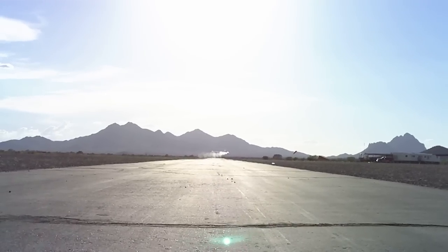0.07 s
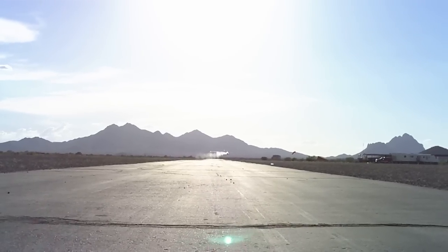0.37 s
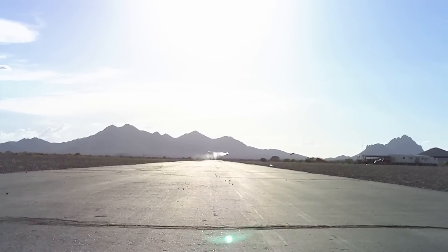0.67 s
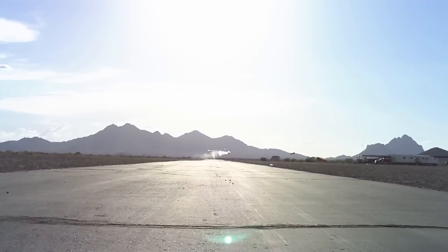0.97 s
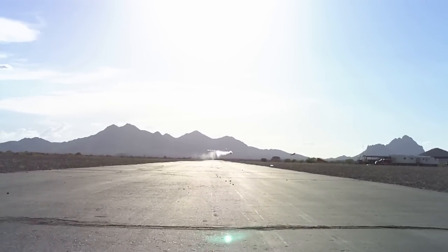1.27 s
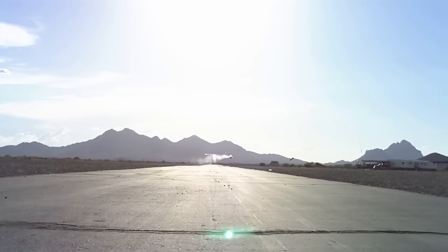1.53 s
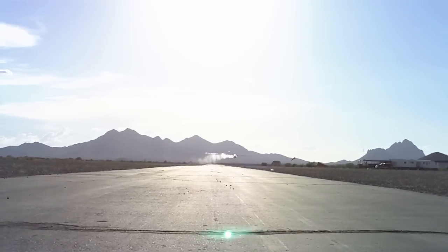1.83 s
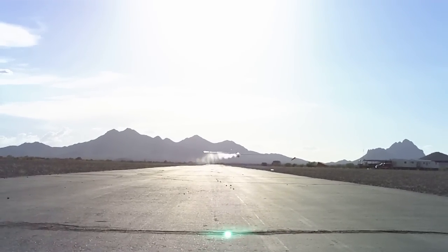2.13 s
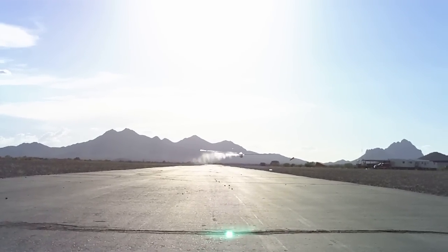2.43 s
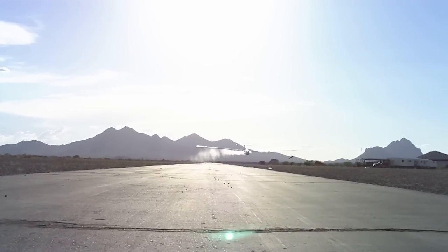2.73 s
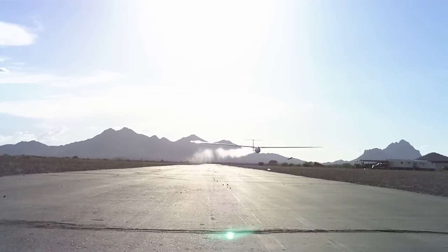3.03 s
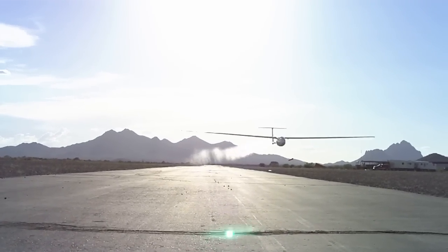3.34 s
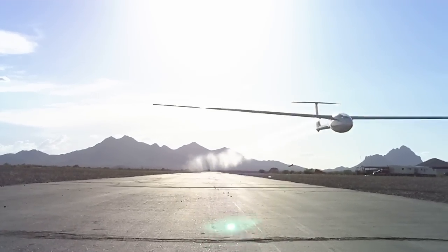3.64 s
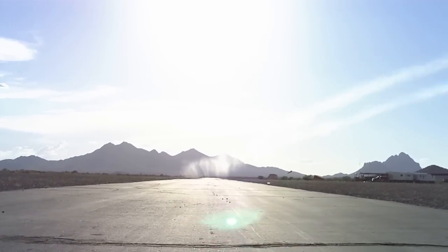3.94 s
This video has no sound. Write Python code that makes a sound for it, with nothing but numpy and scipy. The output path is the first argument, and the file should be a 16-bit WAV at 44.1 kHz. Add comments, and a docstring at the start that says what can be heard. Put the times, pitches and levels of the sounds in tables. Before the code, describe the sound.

The rush of air over a glider's wings builds from barely audible to loud and close, sweeping downward in tone at the end. Uneven gusts thump and rumble on the microphone at an open airfield.

```python
"""A glider comes in low over a runway and sweeps overhead: the rush of air over its wings swells and
brightens, and its reflection from the pavement cuts notches that sweep down as it nears.
Displaced air adds a low whoosh, and the airframe gives a few brief whistles.
Gusts rumble and pop on the microphone, over faint open-air hiss, far birds and a thin electrical whine."""
import sys
import numpy as np
from scipy import signal
from scipy.fft import rfft, irfft
from scipy.io import wavfile
from scipy.ndimage import uniform_filter1d

SR = 44100
rng = np.random.default_rng(int(sys.argv[2]) if len(sys.argv) > 2 else 0)


def store_wav(level_fs):
    """Save 16-bit WAV to argv[1]."""
    pcm = np.round(np.clip(np.atleast_2d(level_fs), -1, 1) * 32767)
    wavfile.write(sys.argv[1], SR, pcm.T.astype(np.int16))


N = 176400
T = np.arange(N) / SR
FREQS = np.fft.rfftfreq(N, 1 / SR)


# swell and brightness of the rush (time [s], level [dB], treble tilt [dB per 10 kHz])
RUSH_SWELL = [(0, -58, -16), (.3, -63, -26), (.55, -63, -9), (.85, -67.5, -16), (1.05, -58, -15.5),
              (1.28, -56, -16.5), (1.55, -58.5, -16.5), (2.0, -61.5, -11), (2.3, -62, -2.5),
              (2.6, -57.5, -9.5), (2.85, -51, -9.5), (3.15, -44, -9.5), (3.35, -42.5, 0.5),
              (3.5, -38.5, 2.5), (3.64, -31.5, -3.5), (3.73, -31.5, 1.5), (3.85, -30.5, 4.5),
              (3.94, -26, 4), (4.0, -20.5, 4)]
# colour of the airflow close by (frequency [Hz], relative level [dB])
RUSH_COLOUR = [(60, -6), (250, -6), (650, 1), (880, -5), (1200, -3), (2300, -2.5), (3300, -3), (4300, -4.5),
               (5200, -6.5), (6000, -7.5), (7000, -13), (10000, -18), (12500, -31), (15000, -39)]
# broad crest in the rush that sinks as the glider nears (time [s], centre [Hz], lift [dB])
RUSH_CREST = [(.7, 3200, -2), (1.25, 3450, 2.5), (2.2, 3500, -3), (3.5, 3500, 2.5), (3.62, 2900, 0.5),
              (3.68, 1430, -0.5), (3.8, 1120, 6.5), (3.87, 890, 8.5), (3.96, 465, 4)]

def wing_rush(crest_octaves=0.3, flutter_db=0.88, patchy_db=0):
    """Turbulent air over the wings swells and brightens, flanged by its bounce off the pavement."""
    framing = dict(fs=SR, nperseg=512, noverlap=384)
    hz, t, hiss = signal.stft(rng.standard_normal(N), **framing)
    hz = hz[:, None]
    level_db, tilt_db = curves(RUSH_SWELL, t)
    crest_hz, lift_db = curves(RUSH_CREST, t)
    crest_db = lift_db * bell(np.log2((hz + 1) / crest_hz), crest_octaves)
    patches = patchy_db * drift(hiss.shape, 14, 7)  # off at 0 dB, for a smooth rush
    flutter = flutter_db * drift(len(t), 5)
    swell = amp(level_db + tilt_db * hz / 10000 + crest_db + patches + flutter)
    colour = unit(spectrum(RUSH_COLOUR, hz))
    return signal.istft(hiss * colour * swell * pavement_comb(hz, t), **framing)[1][:N]


# sweep of the lowest notch cut by the pavement reflection (time [s], frequency [Hz])
NOTCH_SWEEP = [(3.0, 40000), (3.5, 15000), (3.6, 8800), (3.67, 5800), (3.73, 4200), (3.79, 3150),
               (3.85, 2250), (3.91, 1650), (3.96, 1230), (4.0, 1020)]

def pavement_comb(hz, t, reflection=0.53, blur_hz=7100):
    """Comb gain of direct plus reflected sound; the size of the airframe blurs the high notches."""
    delay, = curves([(time, 0.5 / notch_hz) for time, notch_hz in NOTCH_SWEEP], t)
    echo = reflection * bell(hz, blur_hz)
    return abs(1 + echo * np.exp(-2j * np.pi * hz * delay)) / (1 + echo)


# swell of the displaced air (time [s], level [dB])
WHOOSH_SWELL = [(0, -74), (3.2, -50.5), (3.68, -42), (3.82, -35.5), (3.92, -33), (4.0, -28)]
# its dark colour (frequency [Hz], relative level [dB])
WHOOSH_COLOUR = [(30, 2), (150, 7.5), (330, 6.5), (700, -1.5), (1100, -3.5), (1600, -17), (5000, -57)]

def whoosh():
    """Low body of the air pushed aside as the wings arrive."""
    level_db, = curves(WHOOSH_SWELL, T)
    return amp(level_db) * noise(WHOOSH_COLOUR)


# airframe whistles (start [s], length [s], first pitch [Hz], last pitch [Hz], level [dB], waver [Hz])
AIRFRAME_WHISTLES = [(1.11, 0.17, 2070, 2050, -73, 8), (1.395, 0.12, 2075, 2020, -67, 8),
                     (3.967, 0.043, 13600, 12900, -39, 203)]

def whistle(start, length, first_hz, last_hz, db, waver_hz):
    """A brief gliding whistle that fades in and out."""
    progress = np.clip((T - start) / length, 0, 1)
    fade = np.sqrt(abs(np.sin(np.pi * progress)))
    return amp(db) * fade * tone(first_hz + (last_hz - first_hz) * progress, waver_hz)


# gusts on the microphone (time [s], rumble level [dB], buffeting level [dB])
GUSTS = [(0.0, -34.5, -39.5), (0.04, -23.5, -27), (0.13, -27, -40.5), (0.22, -31.5, -32),
         (0.3, -19.5, -33.5), (0.4, -47, -27.5), (0.43, -39, -40), (0.46, -26.5, -29), (0.63, -33, -33),
         (0.69, -27, -41), (0.79, -18, -27.5), (0.82, -28.5, -36), (0.86, -27, -24.5), (0.89, -22.5, -33),
         (0.92, -27, -28), (0.98, -33.5, -46), (1.0, -33.5, -37), (1.09, -31, -45), (1.15, -28.5, -29.5),
         (1.22, -23.5, -27), (1.28, -46, -55.5), (1.39, -28.5, -24.5), (1.45, -32, -35), (1.49, -42, -52),
         (1.6, -30.5, -32.5), (1.64, -31, -52), (1.82, -35, -48.5), (1.865, -17, -37.5), (1.91, -37, -44),
         (1.97, -26.5, -32), (2.19, -30, -48), (2.25, -24.5, -51), (2.37, -39, -44), (2.46, -31, -52),
         (2.68, -31, -35), (2.72, -19.5, -31), (2.81, -29, -45.5), (2.97, -28, -43.5), (3.2, -20, -36),
         (3.22, -28, -45.5), (3.46, -31.5, -29.5), (3.53, -24.5, -34), (3.62, -25.5, -29.5),
         (3.72, -38, -47), (3.79, -25.5, -35), (3.92, -40, -35.5), (4.0, -16.5, -22)]
# sub-bass colour of the rumble (frequency [Hz], relative level [dB])
RUMBLE_COLOUR = [(30, 9), (48, -1.5), (68, 1), (100, -22), (200, -49), (2000, -110)]
# fuller colour of the buffeting (frequency [Hz], relative level [dB])
BUFFET_COLOUR = [(25, -7), (60, 2), (110, -1), (160, -7.5), (230, -13), (330, -18.5), (500, -40.5),
                 (900, -55), (6000, -112)]

def mic_wind(sputter_db=1.5):
    """Gusts hit the microphone with a deep rumble and faster, sputtering buffeting."""
    rumble_db, buffet_db = curves(GUSTS, T)
    rumble = amp(rumble_db) * steadied(noise(RUMBLE_COLOUR), size=6000)
    sputter = sputter_db * drift(N, 900)
    buffet = amp(buffet_db + sputter) * steadied(noise(BUFFET_COLOUR), size=1800)
    return rumble + buffet


# single eddies striking the microphone (time [s], level [dB], half-width [s])
EDDY_POPS = [(.186, -22, 0.0011), (0.2209, -22.5, 0.00083), (0.262, -19.5, 0.0021), (0.319, -15.5, .0013),
             (.372, -14, 0.0055), (.391, -23.5, 0.0013), (0.587, -22.5, 0.0013), (0.623, -22.5, 0.0014),
             (0.646, -15.5, 0.0045), (0.801, -19.5, 0.0018), (.853, -12, 0.002), (.868, -15.5, 0.0022),
             (1.009, -15, 0.0028), (1.15, -19, 0.0022), (1.224, -21.5, 0.0022), (1.392, -18.5, 0.0014),
             (1.537, -22, 0.001), (2.012, -16, .0025), (2.018, -25, 0.00069), (2.249, -21, 0.0033),
             (2.705, -15.5, 0.0027), (2.719, -21, 0.002), (3.173, -21.5, 0.0025), (3.192, -17.5, 0.0039)]

def mic_pops(wake_gain=0.39, wake_half_widths=3.244, port_hz=576, port_q=2.7, ring_gain=0.55):
    """Each eddy pops, trails a weaker one in its wake and briefly rings the microphone port."""
    pops = np.zeros(N)
    for time, db, width in EDDY_POPS:
        skew, wake_skew, lag = rng.random(3)
        wake_time = time + wake_half_widths * width * (0.5 + lag)
        pops += amp(db) * (eddy(time, width, skew) + wake_gain * eddy(wake_time, width, wake_skew))
    ring = signal.lfilter(*signal.iirpeak(port_hz, port_q, SR), pops)
    return pops + ring_gain * ring


def eddy(time, width, skew):
    """A lopsided pressure pulse; skew turns its shape from a bump into a swing and back."""
    return (np.exp(2j * np.pi * skew) / (1 - 1j * (T - time) / width) ** 2).real


# chirps of a far bird (start [s], first pitch [Hz], level [dB])
BIRD_CHIRPS = [(0.368, 2460, -68), (1.596, 2370, -62), (1.766, 2050, -63)]

def bird_chirp(start, hz, db, length_s=0.022, fall=0.16):
    """A tiny whistled call that drops in pitch."""
    return whistle(start, length_s, hz, hz * (1 - fall), db, waver_hz=30)


# buzzy calls of a second far bird (start [s], level [dB])
BIRD_BUZZES = [(.14, -71), (.63, -68.5), (1.735, -70)]

def bird_buzz(start, db, length_s=0.065, centre_hz=4920, width_hz=340):
    """A short rasping call: a narrow band of noise that fades in and out."""
    progress = np.clip((T - start) / length_s, 0, 1)
    band = bell(FREQS - centre_hz, width_hz)
    rasp = unit(irfft(rfft(rng.standard_normal(N)) * band, N))
    return amp(db) * np.sin(np.pi * progress) * rasp


# colour of the open-air bed (frequency [Hz], relative level [dB])
AIR_COLOUR = [(50, 0), (330, 2.5), (660, 0.5), (850, -6.5), (1200, -10.5), (2000, -19.5), (5100, -18.5),
              (5800, -32.5), (6800, -26), (7800, -19), (9500, -29), (11500, -27.5), (13000, -29),
              (14200, -25.5), (15200, -31)]

def open_air(level_db=-55.5):
    """A faint, steady outdoor hiss under everything."""
    return amp(level_db) * noise(AIR_COLOUR)


# partials of the electrical whine (pitch [Hz], level [dB], waver [Hz])
WHINE_PARTIALS = [(7868, -77, 22), (11989, -80, 3)]

def electrical_whine():
    """Two thin, high tones that waver slightly."""
    return sum(amp(db) * tone(hz, waver_hz) for hz, db, waver_hz in WHINE_PARTIALS)


# colour of the noise at the sides (frequency [Hz], relative level [dB])
SIDE_COLOUR = [(25, 12.5), (1500, -51.5), (7000, -32), (14000, -36.5)]

def side_noise(level_db=-58.5):
    """Faint noise that differs between the ears and adds a trace of width."""
    return amp(level_db) * noise(SIDE_COLOUR)


def amp(db):
    """Decibels to gain."""
    return 10 ** (np.asarray(db) / 20)


def unit(x):
    """Scales to rms 1."""
    return x / np.sqrt(np.mean(x ** 2) + 1e-20)


def bell(offset, width):
    """Gaussian curve of height 1."""
    return np.exp(-(offset / width) ** 2 / 2)


def spectrum(colour, hz):
    """Gain of a colour table, read on a log-frequency axis."""
    points_hz, db = np.transpose(colour)
    return amp(np.interp(np.log(hz + 1), np.log(points_hz + 1), db))


def curves(rows, t):
    """Each control of a time table at times t."""
    times, *controls = np.transpose(rows)
    return [np.interp(t, times, control) for control in controls]


def noise(colour):
    """Steady noise of rms 1 with the given colour."""
    return unit(irfft(rfft(rng.standard_normal(N)) * spectrum(colour, FREQS), N))


def steadied(x, size):
    """Evens out the loudness of a noise over size samples."""
    power = uniform_filter1d(uniform_filter1d(x ** 2, size), size)
    return x / np.sqrt(abs(power) + 1e-9)


def drift(shape, *steps):
    """Random wander of rms 1, smoothed over the given number of steps on each axis."""
    wander = rng.standard_normal(shape)
    for axis, size in enumerate(steps):
        wander = uniform_filter1d(wander, size, axis)
    return unit(wander)


def tone(hz, waver_hz):
    """A tone of rms 1 that wavers around a pitch curve."""
    pitch = hz + waver_hz * drift(N, 300)
    return unit(np.sin(2 * np.pi * np.cumsum(pitch) / SR))


def scene():
    """Glider, wind and background sit in the centre, with a trace of noise at the sides."""
    glider = wing_rush() + whoosh() + sum(whistle(*row) for row in AIRFRAME_WHISTLES)
    wind = mic_wind() + mic_pops()
    birds = sum(bird_chirp(*row) for row in BIRD_CHIRPS) + sum(bird_buzz(*row) for row in BIRD_BUZZES)
    mid = glider + wind + birds + open_air() + electrical_whine()
    side = side_noise()
    return np.array([mid + side, mid - side])


def record(dry, cutoff_hz=15250):
    """A steep low-pass trims the very top of the treble."""
    lowpass = signal.firwin(511, cutoff_hz, window=("kaiser", 9), fs=SR)
    return signal.oaconvolve(dry, lowpass[None], "same")


dry = scene()
out = record(dry)
store_wav(out)
```